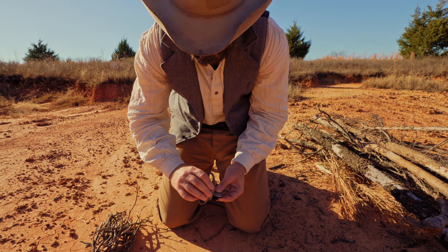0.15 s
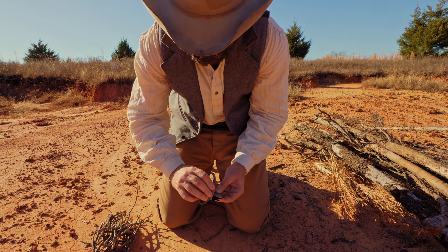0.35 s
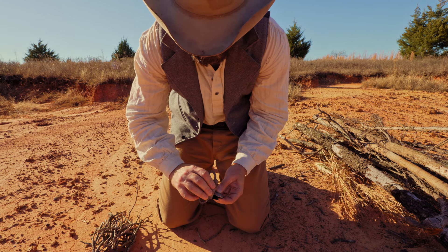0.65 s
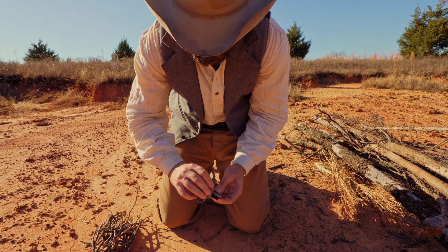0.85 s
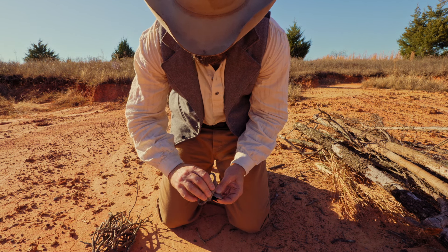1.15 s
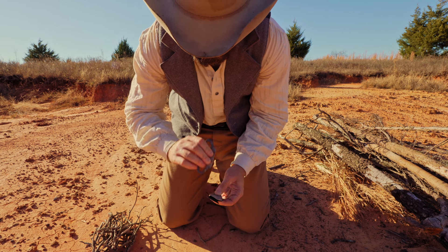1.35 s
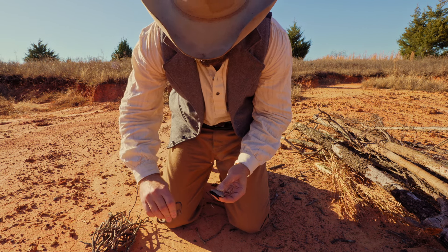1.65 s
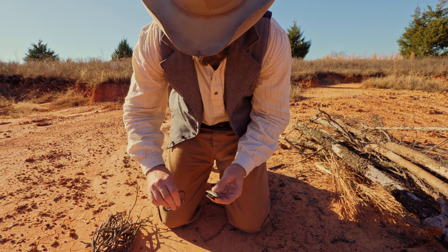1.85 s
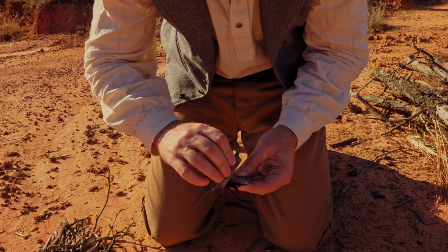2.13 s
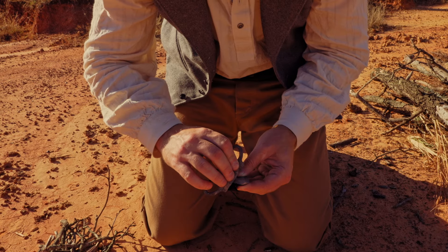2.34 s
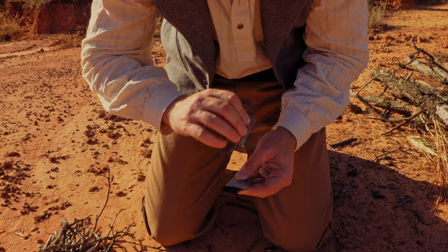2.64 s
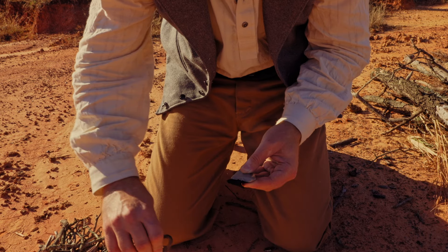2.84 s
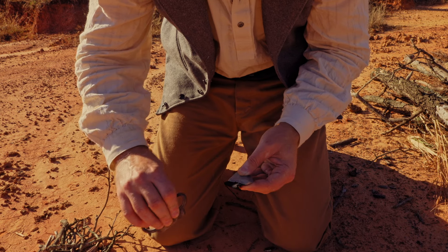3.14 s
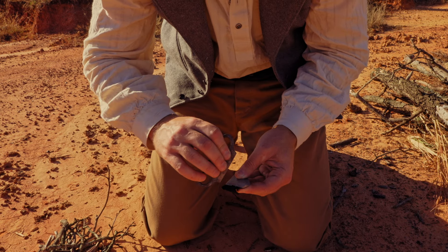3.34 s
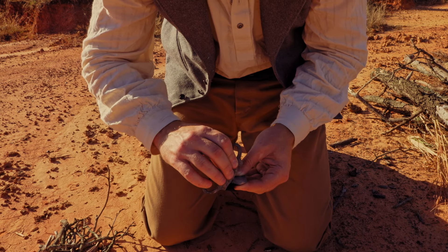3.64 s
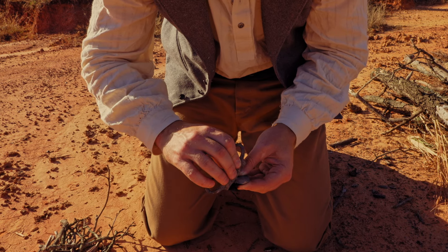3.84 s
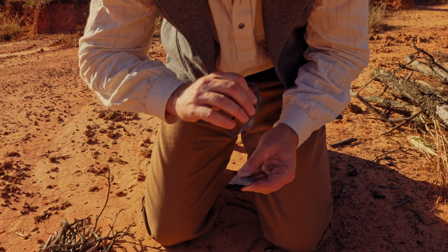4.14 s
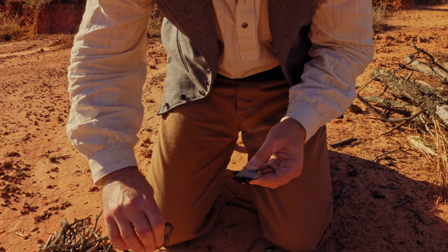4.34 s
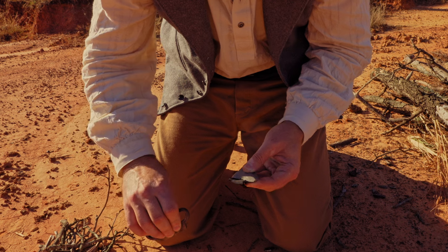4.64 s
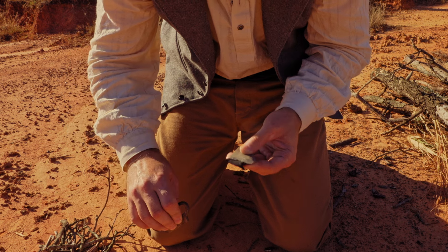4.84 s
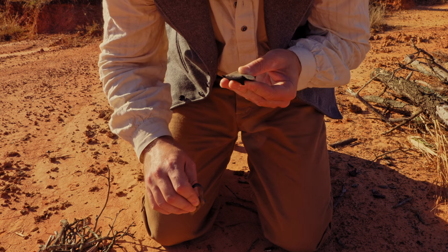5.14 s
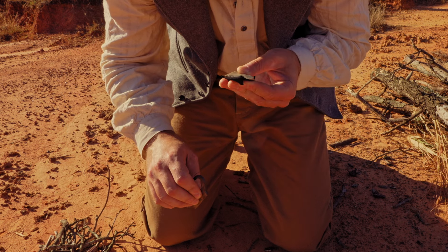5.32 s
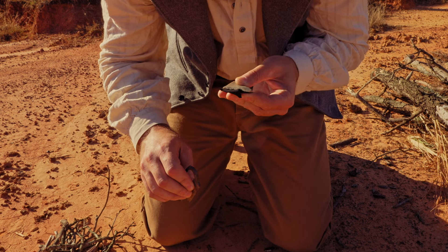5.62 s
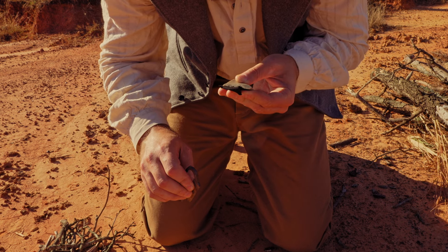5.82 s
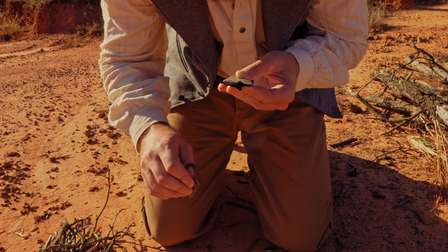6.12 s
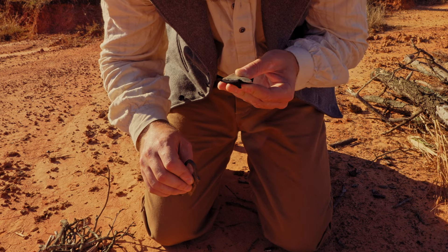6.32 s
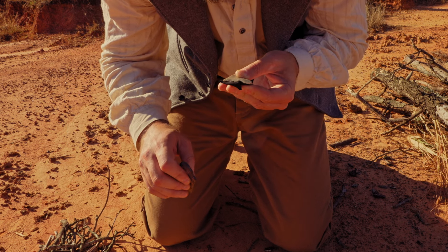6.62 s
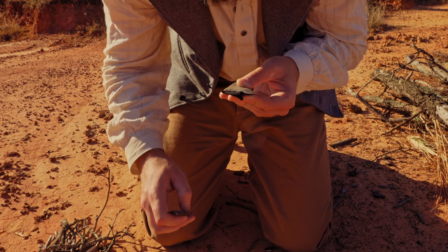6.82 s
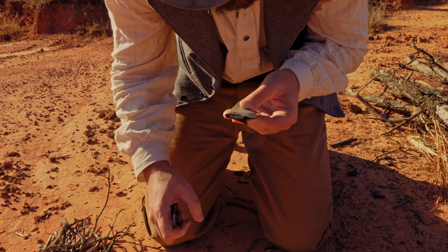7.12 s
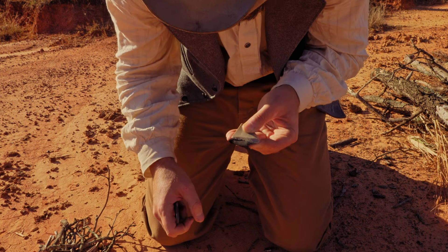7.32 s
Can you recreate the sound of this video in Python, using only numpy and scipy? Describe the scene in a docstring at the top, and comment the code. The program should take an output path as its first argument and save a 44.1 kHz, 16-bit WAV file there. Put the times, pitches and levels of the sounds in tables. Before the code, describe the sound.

Outdoors, a close stereo microphone hears insects shimmering all around, a cricket chirping steadily on the left and another fainter, nearly central. Wind buffets low at first. A steel striker scrapes flint in a sharp bright crack, softer clinks follow as it is set against the stone, then two more hard strikes come. Sleeves rustle and the steel is laid on the ground with a dull knock.

```python
"""A steel striker is scraped down a flint edge three times, close to a stereo microphone outdoors. It is set
against the flint in between and at the end laid on the ground: bursts of force ring modes of steel and stone.
Insects sing all round as throbbing bands of noise, some as narrow trills on the right; one cricket chirps
on the left and another further off. Wind buffets the capsules as low noise, sleeves rustle, and
far engines drone as wavering harmonics over a low rumble and soft hiss."""
import sys
import numpy as np
from scipy import signal
from scipy.fft import rfft, irfft
from scipy.io import wavfile
from scipy.ndimage import uniform_filter1d

SR = 44100
rng = np.random.default_rng(int(sys.argv[2]) if len(sys.argv) > 2 else 0)


def gain_from_db(level_db):
    """Turn a decibel level (scalar or array-like) into a linear amplitude factor."""
    decades = np.asarray(level_db, float) / 20
    return 10 ** decades


def log_audio(samples):
    """Write samples as a 16-bit WAV file to the path given in sys.argv[1]."""
    # one column per channel
    frames = np.atleast_2d(samples).T
    # limit to full scale, then quantise
    limited = np.clip(frames, -1, 1)
    pcm = np.round(limited * 32767).astype(np.int16)
    wavfile.write(sys.argv[1], SR, pcm)


N = 329427
T = np.arange(N) / SR  # time [s]
F = np.fft.rfftfreq(N, 1 / SR) + 1e-3  # frequency [Hz], kept above zero for the logarithm


def curve(table, outside=None):
    """Columns of a table at every sample."""
    s, *columns = np.transpose(table)
    return [np.interp(T, s, column, outside, outside) for column in columns]


def unit(x):
    """Scale to rms 1."""
    return x / np.sqrt(np.mean(x ** 2))


def noise(points, column=1, lo_hz=0, hi_hz=SR):
    """Gaussian noise with a (frequency [Hz], level [dB]) colour inside a band."""
    p = np.array(points)
    colour_db = np.interp(np.log(F), np.log(p[:, 0]), p[:, column])
    gain = gain_from_db(colour_db) * (F >= lo_hz) * (F < hi_hz)
    return irfft(rfft(rng.standard_normal(N)) * gain, N)


def walk(rate):
    """Random values held for 1 / rate s and smoothed twice, scaled to rms 1."""
    hold = int(SR / rate)
    steps = np.repeat(rng.standard_normal(N // hold + 1), hold)
    return unit(uniform_filter1d(uniform_filter1d(steps, hold), hold)[:N])


def ring(x, hz, width):
    """One damped mode: a two-pole resonance of the given width in Hz."""
    r = np.exp(-np.pi * width / SR)
    poles = [1, -2 * r * np.cos(2 * np.pi * hz / SR), r * r]
    return signal.lfilter([1, 0, -1], poles, x) * (1 - r * r) / 2


def tone(table, orders):
    """A hum whose pitch and partials waver; orders are (multiple of the pitch, level [dB])."""
    hz = np.interp(T, *np.transpose(table)[:2])
    phase = 2 * np.pi * np.cumsum(hz * (1 + 0.0017 * walk(3.09))) / SR
    partials = sum(gain_from_db(db + 1.7 * walk(4.5)) * np.sin(k * phase) for k, db in orders)
    return np.sqrt(2) * gain_from_db(curve(table, -120)[1]) * partials


# colour of the still air at the microphone: (frequency [Hz], relative level [dB])
AIR_COLOUR = [(88, -13), (150, -8), (242, -7.5), (322, -13), (581, -19.5), (2520, -21.5), (3000, -22.5),
              (3900, -55), (6600, -120)]


def air():
    """Still air and far-off hiss: steady noise, half alike in both channels."""
    both, left, right = (unit(noise(AIR_COLOUR, lo_hz=121, hi_hz=3150)) for _ in range(3))
    return gain_from_db(-58.5) * np.array([0.91 * both + left, 1.02 * both + right])


# low rumble from far away, before the channel gains: (time [s], level [dB])
RUMBLE_LEVEL = [(1.9, -52), (2.35, -50.5), (3.11, -51), (4.32, -50), (4.4, -47.5), (5.28, -49.5),
                (6.12, -47), (7.47, -50.5)]
# its colour: (frequency [Hz], relative level [dB])
RUMBLE_SPECTRUM = [(15, -27), (40, 2), (90, 0.5), (150, -6.5), (250, -22.5), (400, -42)]


def rumble():
    """Low noise from far away, stronger on the right."""
    both, left, right = (unit(noise(RUMBLE_SPECTRUM, hi_hz=600)) for _ in range(3))
    return gain_from_db(curve(RUMBLE_LEVEL)[0]) * np.array([.5 * both + .5 * left, 0.5 * both + 1.06 * right])


# far engine, before the channel gains: (time [s], pitch [Hz], level [dB])
ENGINE = [(1.9, 61.2, -55), (2.05, 60.8, -52), (3.38, 60.78, -51.5), (4.44, 61.1, -59.5), (5.13, 60.9, -60),
          (5.4, 57.4, -71)]
# its harmonics: (multiple of the pitch, relative level [dB])
ENGINE_ORDERS = [(1, 2.5), (2, -3.5), (3, -26), (4, -18)]


def drone():
    """A far engine: low harmonics, stronger on the right and of opposite sign on the left."""
    return tone(ENGINE, ENGINE_ORDERS) * np.array([[-.3], [2.2]])


# three higher hums that come and go, before the channel gains:
# each (time [s], nominal pitch [Hz], sounding at 0.99 of it, level [dB])
HIGH_HUMS = [
    [(3.1, 145, -80), (3.164, 144.6, -54), (3.9, 143.5, -61)],
    [(4.6, 143.5, -62), (6.04, 144, -47.5), (7.0, 144.3, -81)],
    [(6.2, 119.4, -57.5), (7.252, 116, -56), (7.4, 116.1, -66)],
]


def hum():
    """Single wavering partials that come and go, a little stronger on the right."""
    return sum(tone(part, [(0.99, 0)]) for part in HIGH_HUMS) * np.array([[.8], [1.2]])


# gusts at the capsules, before puffs and channel gains: (time [s], level [dB])
GUSTS = [(0, -58), (.1, -42.5), (.3, -49), (.4, -36.5), (.48, -39.5), (.6, -48.5), (.76, -37), (.85, -42),
         (1.1, -38.5), (1.35, -47.5), (1.52, -39), (1.7, -44), (1.78, -37), (1.97, -41.5), (2.1, -73),
         (4.4, -64), (4.53, -46), (4.62, -67)]
# colour of the gusts: (frequency [Hz], relative level [dB])
GUST_COLOUR = [(15, -35), (25, -3), (33, -5), (65, -2.5), (134, -9.5), (242, -20), (793, -42.5),
               (1000, -56), (1300, -103), (2200, -120)]
# slow pressure pushes, before the channel gains: (time [s], level [dB])
PUSHES = [(0.0, -56), (0.14, -36), (0.68, -44.5), (1.23, -28), (1.87, -56), (2.16, -37.5), (4.43, -50.5),
          (4.8, -37), (5.22, -48), (6.95, -56.5), (7.47, -46)]


def wind():
    """Gusts rumble on both capsules in quick puffs, brighter when strong; slow pushes fall mostly on the right."""
    db, puffs = curve(GUSTS, -120)[0], walk(15.8)
    both, left, right = (unit(noise(GUST_COLOUR, hi_hz=1500)) * gain_from_db(1.5 * walk(14)) for _ in range(3))
    gusts = np.array([0.97 * both + .5 * left, 1.15 * both + 0.55 * right]) * gain_from_db(db + 1.7 * puffs)
    # the flutter grows 2.5 dB for each dB of gust
    flutter_db = -55.5 + 2.5 * (db + 36.0) + 2 * puffs
    flutter = unit(ring(rng.standard_normal(N), 220, 190)) * gain_from_db(flutter_db)
    push_colour = [(3, -5.0), (9, 6.0), (22, -7.5), (40, -34)]
    push = unit(noise(push_colour, hi_hz=61)) * gain_from_db(curve(PUSHES)[0])
    return gusts + flutter + push * np.array([[.15], [1.9]])


# sleeves moving: (time [s], level [dB])
SLEEVES = [(6.3, -67), (6.68, -56), (6.882, -55.5), (7.3, -54), (7.4, -64), (7.47, -49)]


def rustle():
    """Cloth rustles in fine grains: noise of ragged level through one broad resonance."""
    cloth = ring(rng.standard_normal(N) * gain_from_db(2.1 * walk(60)), 600, 1560)
    return gain_from_db(curve(SLEEVES, -120)[0]) * unit(cloth)


def bouts(table, rest_db):
    """Level in dB of singers that swell through each bout over a resting murmur."""
    swell_db, edge_s = 5, .03
    power = gain_from_db(2 * rest_db)
    for start, end, end_db in table:
        on = np.clip(np.minimum(T - start, end - T) / edge_s + .5, 0, 1)
        remaining = np.clip((end - T) / (end - start), 0, 1)
        power = power + on * gain_from_db(2 * (end_db - swell_db * remaining))
    return 10 * np.log10(power)


# colour of the insects all round: (frequency [Hz], relative left level [dB], relative right level [dB])
CHORUS_COLOUR = [(2420, -47, -38), (2680, -32, -24), (3990, -31, -16), (4450, -14.5, -9),
                 (4580, -24.5, -13), (6650, -27.5, -11), (7400, -19.5, -9.5), (7800, -3.5, -4),
                 (8420, 1, 2.5), (9020, -11.5, -9.5), (10000, -14.5, -12.5), (12400, -16.5, -15),
                 (15400, -11.5, -15)]
# kinds of singer, each up to where the next begins:
# (lowest frequency [Hz], throb rate [1/s], left throb depth [dB], right throb depth [dB])
SINGER_KINDS = [(2540, 13, 4, 1.5), (3976, 22.5, 5, 0.5), (5820, 17, -1, 1), (7500, 31, 1, 2.5),
                (9210, 5.9, 1.5, 2.5), (10070, 61, 2.5, 0.5), (12200, 67, 2, 5)]
# the five lower kinds, as the sum of both channels halved: (time [s], then one level [dB] per kind)
SONG_LEVELS = [(0.0, -62, -51.5, -51, -39, -47.5), (2.29, -57.5, -50.5, -47.5, -38.5, -54.5),
               (3.04, -56.5, -49.5, -45.5, -39.5, -51), (6.55, -57, -51, -45, -38, -51.5),
               (7.47, -58.5, -48.5, -46, -40, -53)]
# bouts of the second highest kind: (start [s], end [s], level at the end [dB])
HIGH_SINGING = [(-.5, 0.683, -45), (0.685, 1.019, -47.5), (1.051, 1.76, -52.5), (2.412, 3.421, -48),
                (3.42, 3.7, -47), (3.718, 4.3, -53.5), (4.3, 5.415, -47), (6.3, 7.601, -54.5)]
# bouts of the highest kind: (start [s], end [s], level at the end [dB])
TOP_SINGING = [(-.5, .425, -47), (.7, 1.03, -52), (1.33, 3.415, -50.5), (3.45, 3.7, -55),
               (4.27, 5.415, -45.5), (6.05, 7.6, -50)]


def chorus():
    """Many far insects blur to noise; each kind throbs at its own rate, with separate noise left and right."""
    out = 0
    tops_hz = [row[0] for row in SINGER_KINDS[1:]] + [15800]
    levels = curve(SONG_LEVELS) + [bouts(HIGH_SINGING, -54.5), bouts(TOP_SINGING, -51)]
    for (lo, rate, *depth_db), hi, db in zip(SINGER_KINDS, tops_hz, levels):
        phase = 2 * np.pi * np.cumsum(rate * (1 + 0.0292 * walk(3.04))) / SR
        pair = []
        for c in (0, 1):
            throb_db = depth_db[c] * np.sin(phase) + 0.78 * walk(14)
            pair.append(noise(CHORUS_COLOUR, c + 1, lo, hi) * gain_from_db(throb_db))
        pair = np.array(pair)
        out = out + gain_from_db(db) * pair / np.sqrt(np.mean(pair.mean(0) ** 2))
    return out


# single insects that hold one note, before the channel gains:
# (start [s], end [s], frequency [Hz], width [Hz], level [dB])
HELD_NOTES = [(0, 1.4, 5900, 160, -56), (0, 2.75, 5250, 150, -61.5), (3.4, 10, 3760, 200, -62.5),
              (3.9, 8.5, 6560, 250, -54), (4.3, 7.47, 5450, 200, -57), (0, 7.47, 8500, 160, -50.5),
              (4.4, 5.3, 11050, 500, -54), (4.6, 5.3, 15240, 696, -60), (6.3, 8, 14400, 149.6, -60)]


def trills():
    """Noise through a narrow resonance, throbbing, stronger on the right; each note fades in and out."""
    out = 0
    for start, end, hz, width, db in HELD_NOTES:
        note = ring(ring(rng.standard_normal(N), hz, width), hz, 2 * width)
        throb = gain_from_db(2.1 * np.sin(2 * np.pi * (33.2 * T + rng.random())) + 1.8 * walk(3.35))
        fade = np.clip(np.minimum(T - start + 0.053, end + .1 - T) / 0.26, 0, 1)
        out = out + gain_from_db(db) * unit(note * throb) * fade
    return out * np.array([[.4], [1.9]])


def cricket(chirps, strokes, left_db, right_db):
    """Each wing stroke is a 26 ms tone, lower in pitch at both ends; uneven file teeth make it beat."""
    out, t = np.zeros(N + SR), np.arange(-800, 800) / SR
    for middle_s, chirp_db in chirps:
        for late, step_db, stroke_hz in strokes:
            # each stroke strays a little in time, level and pitch
            stray = np.array([.002, 1.8, 22]) * rng.standard_normal(3)
            s, db, hz = np.array([middle_s + late, chirp_db + step_db, stroke_hz]) + stray
            pitch = hz - 200 * np.clip(t / 0.0097, 0, 2) ** 2 - 60 * np.clip(-t / .014, 0, 2) ** 2
            beat = 1 + .5 * rng.random() * np.cos(2 * np.pi * (185 * t + rng.random()))
            carrier = np.sin(2 * np.pi * (np.cumsum(pitch) / SR + rng.random()))
            stroke = np.exp(-(t / .013) ** 4) * beat * carrier
            out[int(s * SR) - 800:][:len(t)] += gain_from_db(db) * stroke
    return out[:N] * gain_from_db(np.array([[left_db], [right_db]]))


# a further cricket, before the channel gains: (middle of chirp [s], level [dB])
FURTHER_CHIRPS = [(.179, -44), (1.372, -44), (1.79, -45.5), (1.95, -48), (2.167, -44), (2.508, -44),
                  (3.067, -49), (3.442, -47), (3.682, -48), (4.003, -43.5), (4.505, -48), (4.665, -49),
                  (4.985, -44), (5.41, -53), (5.728, -42.5), (6.192, -42), (6.66, -42), (7.34, -44)]
# its wing strokes: (time from middle [s], relative level [dB], pitch [Hz])
FURTHER_STROKES = [(-.023, -0.5, 4506), (.023, 0, 4576)]


def far_cricket():
    """Chirps of two wing strokes, nearly central."""
    return cricket(FURTHER_CHIRPS, FURTHER_STROKES, -2, -2.9)


# the near cricket on the left, before the channel gains: (middle of chirp [s], level [dB])
CLOSE_CHIRPS = [(.248, -38), (.542, -39), (.935, -38.5), (1.299, -40), (1.667, -38), (2.059, -40),
                (2.377, -41.5), (2.746, -40), (3.132, -40), (3.506, -40), (3.864, -38.5), (4.193, -37.5),
                (4.56, -39), (4.834, -42.5), (5.236, -43.5), (5.599, -41.5), (5.968, -41), (6.37, -38.5),
                (6.74, -43), (7.073, -41), (7.409, -46)]
# its wing strokes: (time from middle [s], relative level [dB], pitch [Hz])
CLOSE_STROKES = [(-.045, -3, 4700), (0, -1, 4720), (.045, -0.5, 4735)]


def near_cricket():
    """Chirps of three wing strokes, well to the left."""
    return cricket(CLOSE_CHIRPS, CLOSE_STROKES, 3.2, -14)


# knocks through hands and ground, close by: (time [s], level [dB], frequency [Hz], decay [ms])
KNOCKS = [(1.527, -27, 600, 1.5), (2.258, -39, 600, 1.5), (2.817, -38, 250, 1.7), (3.5605, -41, 704, 2),
          (4.251, -24, 342, 0.98), (7.346, -44, 418, 19), (7.386, -34, 379, 17), (7.398, -37.5, 576, 11)]


def thuds():
    """Short dull knocks: a decaying sine roughened by noise around the same pitch."""
    out, t = np.zeros(N), np.arange(2000) / SR
    for s, db, hz, decay in KNOCKS:
        rough = ring(rng.standard_normal(len(t)), hz, 1.4 * hz)
        knock = np.sin(2 * np.pi * hz * t) + 0.48 * unit(rough)
        out[int(s * SR):][:len(t)] += gain_from_db(db) * knock * np.exp(-1000 * t / decay)
    return out


# modes of the striker, before each contact's tilt: (frequency [Hz], width [Hz], relative level [dB])
STEEL_MODES = [(3083, 760, 5), (3444, 140, 5.5), (4150, 294, 6.5), (4416, 140, 4.5), (4980, 330, 6.5),
               (5900, 570, 4.5), (7170, 160, 4), (7480, 130, 5), (7920, 150, 12.5), (8620, 38, 0),
               (8990, 660, 3), (11400, 260, -6), (11400, 180, 3.5), (12380, 190, -8), (13800, 1200, -8)]
# modes of the flint, before each contact's stone level: (frequency [Hz], width [Hz], relative level [dB])
STONE_MODES = [(900, 250, -15), (1300, 450, -9.5), (1930, 103, -9.5), (2300, 330, -2)]
# sudden blows of steel on flint, close to the microphone:
# (time [s], force [dB], decay [ms], treble tilt [dB per octave], stone level [dB])
STEEL_BLOWS = [(0.9672, -29.5, 1.2, -15, -10), (1.5266, -6.5, 1.05, 4.5, -14), (2.2514, -26.5, .8, -9, 6),
               (2.2557, -18, 1.2, -17, -10), (2.2579, -12.5, 1.0, -7.5, 1), (2.8175, -5.5, 1.3, 5, -19),
               (3.5589, -24, 0.38, -14, 8), (3.5606, -19, 0.74, -16, 4), (4.2505, -8, 2.1, 5.5, -8)]
# the edge biting along the steel, and soft touches:
# (time [s], force [dB], decay [ms], treble tilt [dB per octave], stone level [dB])
EDGE_BITES = [(1.530, -27, 1.8, 15, -9), (1.534, -9.5, 4.4, -11, -9), (1.5384, -7, 2.1, -5.5, 4),
              (1.543, -22, 1.3, -2.5, -8), (1.655, -41.5, 2.5, 3, 13), (2.822, -18, 4.9, -20, -19),
              (2.8279, -6.5, 3, 1.5, -4), (3.563, -30, 1.8, -12, 6), (4.2566, -13, 3.5, -4, 5.5),
              (4.259, -10.5, 2.45, 1, 7), (4.301, -37.5, 2.2, -3, 10), (5.13, -48, 2.5, -8, 2),
              (7.35, -39, 7, -8, -3), (7.401, -31, 11, -12, 7.5)]


def striker():
    """Gritty bursts of force ring steel and stone: blows start at once, bites swell for as long as they decay."""
    out, n = np.zeros(N), 2600
    t = np.arange(n) / SR * 1000 - 12  # [ms] from the contact
    onset = np.argmax(t >= 0)
    blow_rise_ms = 0.012
    contacts = [(blow_rise_ms, *row) for row in STEEL_BLOWS] + [(row[2], *row) for row in EDGE_BITES]
    for rise, s, db, decay, tilt, stone_db in contacts:
        grit = rng.standard_normal(n) * gain_from_db(2.2 * rng.standard_normal(n))
        fall = np.where(t < 0, (t / rise) ** 2, np.abs(t / decay) ** 2.3)
        force = 0.42 * unit(grit) * np.exp(-fall)
        # the first sample hits harder the more sudden the contact
        force[onset] = 1.94 + 1.27 * np.exp(-abs(rise) / 0.11)
        modes = [(hz, width, g + stone_db) for hz, width, g in STONE_MODES]
        modes += [(hz, width, g + tilt * np.log2(hz / 4000)) for hz, width, g in STEEL_MODES]
        body = 0
        for k, (hz, width, g) in enumerate(modes):
            # neighbouring modes alternate in sign
            body = body + (-1) ** k * gain_from_db(g) * ring(force, hz, width) * np.sqrt(1000 / width)
        crack = gain_from_db(-4 + tilt) * ring(force, 5000, 9000)  # the unpitched part
        i = int(s * SR) - onset
        out[i:i + n] += (gain_from_db(db) * (body + crack))[:N - i]
    return out


def scene():
    """All layers together, with the steel in the middle."""
    background = air() + rumble() + drone() + hum() + wind() + rustle()
    insects = chorus() + trills() + far_cricket() + near_cricket()
    return background + insects + thuds() + striker()


def top_cut(x):
    """Nothing passes above the cut-off."""
    return signal.sosfilt(signal.butter(12, 16970, fs=SR, output="sos"), x)


def record(dry):
    """The top is cut above 15750 Hz and the loudest peaks are rounded off."""
    low_pass = signal.ellip(10, .3, 60, 15750, fs=SR, output="sos")
    held = 1.15 * np.tanh(signal.sosfilt(low_pass, dry) / 1.15)
    return top_cut(held)


dry = scene()
out = record(dry)
log_audio(out)
```